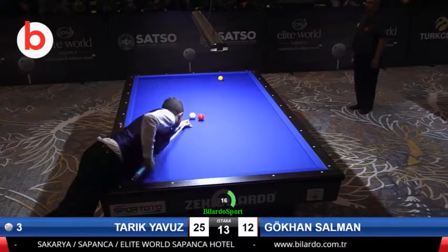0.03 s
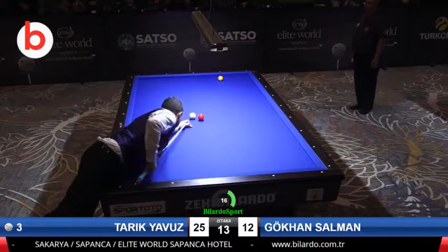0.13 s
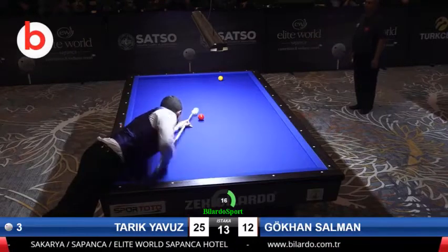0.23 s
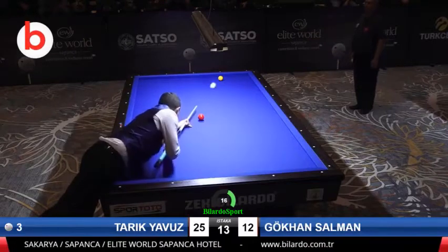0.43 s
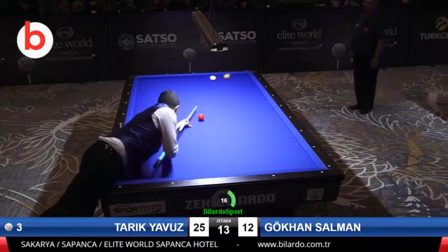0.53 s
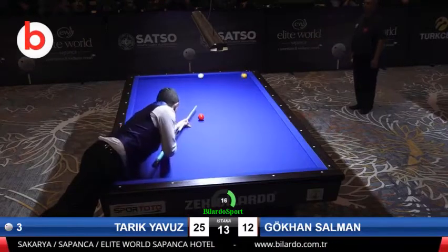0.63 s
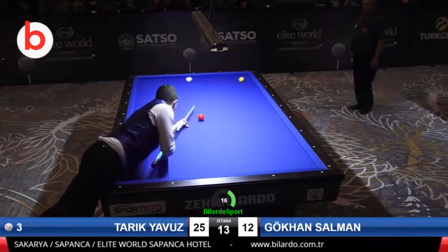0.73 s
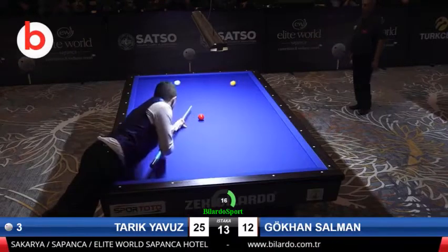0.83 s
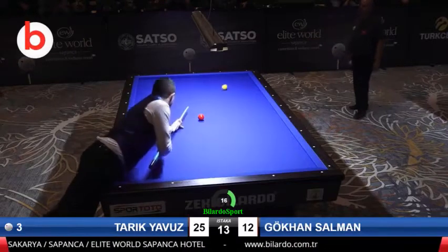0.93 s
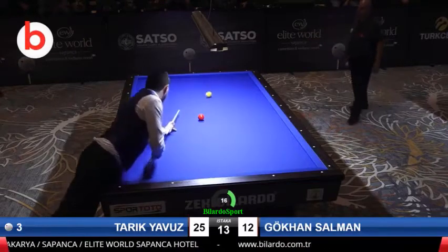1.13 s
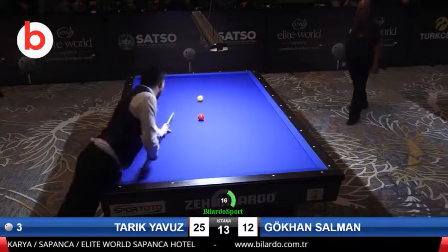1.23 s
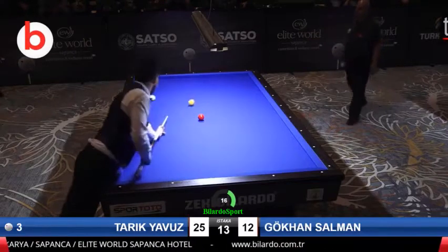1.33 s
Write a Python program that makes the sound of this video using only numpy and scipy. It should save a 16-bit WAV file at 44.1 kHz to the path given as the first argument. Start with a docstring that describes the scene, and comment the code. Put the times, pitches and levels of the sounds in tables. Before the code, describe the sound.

A billiard cue strikes a ball with a loud, woody knock, and a moment later the ball clicks hard and bright against a second one; both echo in a large, quiet hall, close and slightly overloaded.

```python
"""Faint rumble and hiss, then a carom shot in a large hall: the cue knocks the ball, which clicks
against a second ball 0.3 s later. Damped modes and a noise crack make the knock; half-sine contact
pulses along several paths make the click. Decaying filtered noise rings out the hall.
The microphone overloads on the blows; a noise suppressor swallows the ends of the tails."""
import sys
import numpy as np
from scipy import signal
from scipy.fft import rfft, irfft, next_fast_len
from scipy.io import wavfile
from scipy.ndimage import uniform_filter1d

SR = 44100
rng = np.random.default_rng(int(sys.argv[2]) if len(sys.argv) > 2 else 0)


def unload_wav(signal):
    """Save mono or channel-first audio to the path in sys.argv[1] as 16-bit WAV at rate SR, clipped to [-1, 1]."""
    wavfile.write(
        sys.argv[1],
        SR,
        np.round(np.clip(np.atleast_2d(signal).T, -1, 1) * 32767).astype(np.int16),
    )


N = 61739

# steady rumble and hiss (frequency [Hz], relative density [dB per Hz])
FLOOR_SPECTRUM = [(15, 2), (30, -1), (45, -14.5), (100, -19), (250, -28), (500, -27), (1000, -41),
                  (3500, -44), (6000, -42.5), (14500, -40), (16000, -56)]
# the hall's background air (frequency [Hz], relative density [dB per Hz])
AIR_SPECTRUM = [(100, -24.5), (420, -2), (900, -7.5), (2500, -9.5), (3800, -19), (8000, -20.5)]
# decay of the hall (frequency [Hz], t60 [s])
HALL_T60 = [(200, 1.5), (800, 0.9), (2400, 1.007), (5000, 0.62), (12000, .65)]
# what the cue blow sends into the hall (frequency [Hz], relative density [dB per Hz])
CUE_HALL_SPECTRUM = [(70, -51), (120, -31), (180, -6), (350, -14.5), (450, 2), (950, -1.5), (1400, -4),
                     (1900, -16.5), (2400, -11.5), (2850, -19), (5600, -21), (7000, -24), (11000, -27),
                     (15000, -32.5), (16000, -53.5)]
# narrow resonances that the cue leaves in the hall (centre [Hz], width [Hz], level over the rest [dB])
CUE_HALL_PEAKS = [(215, 20, 4.5), (314.8, 20, 10), (430, 25, -1.5), (730, 50, 8), (930, 70, 6),
                  (1215, 70, 6.5), (1718, 40, 14.5), (2100, 40, 12), (2403, 70, 12), (3070, 150, 7),
                  (5450, 500, 7.5)]
# ringing of cue and ball (frequency [Hz], level [dB], t60 [s])
CUE_MODES = [(430, -20, .18), (517, -22, 0.13), (735, -26.5, 0.046), (880, 1.5, 0.015), (955, -12.5, .08),
             (1170, -10.5, .06), (2450, -16.5, .05), (3050, -21.5, .03), (3900, -30.5, 0.075),
             (4740, -17, .02), (5940, -23, 0.05)]
# the tip's crack (frequency [Hz], relative density [dB per Hz])
CRACK_SPECTRUM = [(100, -39.5), (400, -14.5), (1000, 1.5), (2500, 0), (3800, -7.5), (5300, 3),
                  (6800, -15.5), (11000, -10), (16000, -22)]
# distinct echoes of the crack (time [s], level [dB])
CRACK_ECHOES = [(0.2379, -19), (0.2442, -18), (0.2483, -19.5), (.2505, -19.5)]
# click paths: direct, off table and rails, off ceiling, off walls (delay [s], level [dB], centre [Hz])
CLICK_PATHS = [(0, 0, 2550), (.00125, -6, 2550), (.00208, -9, 2550), (.0097, -23, 1900), (.0116, -2, 2950),
               (.0132, -15, 2200), (.018, -15, 3000), (.021, -19, 2000), (.023, -19, 2000)]
# what the click sends into the hall (frequency [Hz], relative density [dB per Hz])
CLICK_HALL_SPECTRUM = [(100, -55), (200, -29.5), (450, -23.5), (700, -17), (1000, -6.5), (1400, -1),
                       (2400, 5.5), (3700, 4.5), (5200, -6), (8000, -12.5), (12500, -0.5), (15500, -8.5),
                       (16500, -19)]
# resonances in the click's tail (centre [Hz], width [Hz], level over the rest [dB])
CLICK_HALL_PEAKS = [(696, 88, 13), (520, 46, 7.5), (2460, 190, 2)]
# phase between the ports (frequency [Hz], left lead [rad])
PORT_PHASE = [(50, 0), (800, .45), (2400, .25), (5000, .2), (10000, .05)]
# balance of the ports (frequency [Hz], left minus right [dB])
PORT_BALANCE = [(60, -2), (180, 1.5), (550, -0.5), (1650, -1.0), (4970, -2.5), (15000, 0)]
# suppressor threshold before learning (frequency [Hz], density [dB per Hz])
THRESHOLD = [(150, -68.5), (400, -89), (800, -79), (1400, -70.5), (2400, -79), (3800, -91.5), (6000, -91.5),
             (12000, -92)]

FLOOR_DB = -60.5
AIR_DB, AIR_FROM_S, AIR_RISE_S = -72.5, 0.61, 0.64
HALL_RIPPLE_DB, HALL_RIPPLE_SPACING_HZ = 1.5, 35.73  # uneven response
FAR_WALL_S, FAR_WALL_SPREAD_S, FAR_WALL_DB = .115, 0.01, -16  # blurred return swell
CUE_HALL_DB, CLICK_HALL_DB = -21.5, -21

CUE_S, CUE_DB, TIP_LEAD_S = .2195, 0, 0.0021  # the tip touches before the knock
CRACK_DB, CRACK_T60_S, CRACK_RISE_S = -13.5, 0.027, .002
SNAP_S, SNAP_DB = .2209, -13
THUD_S, THUD_HZ, THUD_DB, THUD_T60_S = .2318, 730, 0.5, 0.016

CLICK_S, CLICK_DB = .5114, 5
CONTACT_S, CONTACT_FILL_DB = .000328, -29.5  # duration; depth of spectral gaps in the tail
BALL_WIDTH_HZ = 1600  # band a ball radiates best

SUPPRESS_MAX_DB, SUPPRESS_DB_PER_DB = 24, 2.56  # deepest cut; cut per dB under threshold
LEARN_DB, LEARN_S = -10.5, 0.93  # share of lasting sound added to the threshold; time constant
CLIP_TOP = .56  # full scale = 1
TOP_HZ = 16200


def amp(db):
    """Decibels to gain."""
    return 10 ** (np.asarray(db) / 20)


def unit(x):
    """Scale to rms 1."""
    return x / np.sqrt(np.mean(x ** 2) + 1e-20)


def along(points, hz):
    """Interpolate (Hz, value) points on a log frequency axis."""
    point_hz, value = np.transpose(points)
    return np.interp(np.log(hz + 1), np.log(point_hz + 1), value)


def since(start_s):
    """Seconds after start_s, zero before."""
    return np.maximum(np.arange(N) / SR - start_s, 0)


def decay_60(t_s, t60_s):
    """Exponential decay that loses 60 dB in t60_s."""
    return np.exp(-np.log(1000) * t_s / t60_s)


def fade(t_s, rise_s, t60_s):
    """Rise with time constant rise_s, times exponential decay."""
    return (1 - np.exp(-t_s / rise_s)) * decay_60(t_s, t60_s)


def filtered(x, response):
    """Multiply the spectrum of x by a response of frequency, zero-padded."""
    m = next_fast_len(N + SR // 2)
    hz = np.fft.rfftfreq(m, 1 / SR)
    return irfft(rfft(x, m) * response(hz), m)[..., :N]


def noise(spectrum, side_db):
    """Coloured stereo noise of rms 1: common mid, weaker opposed side."""
    mid, side = filtered(rng.standard_normal((2, N)), lambda hz: amp(along(spectrum, hz)))
    side = amp(side_db) * side
    return unit(np.array([mid + side, mid - side]))


def resonance(hz, centre_hz, width_hz):
    """Causal band-pass response of a damped resonator."""
    damping = 1j * hz * width_hz
    return damping / (centre_hz ** 2 - hz ** 2 + damping)


def coloured(spectrum, peaks):
    """Gain over frequency: a broad spectrum with narrow resonant peaks."""
    def gain(hz):
        peaks_db = sum(db * abs(resonance(hz, centre_hz, width_hz)) ** 2
                       for centre_hz, width_hz, db in peaks)
        return amp(along(spectrum, hz) + peaks_db)
    return gain


def background():
    """Steady rumble and hiss, plus hall air that swells after the shot."""
    swell = np.clip(since(AIR_FROM_S) / AIR_RISE_S, 0, 1)
    steady = amp(FLOOR_DB) * noise(FLOOR_SPECTRUM, side_db=-20)
    return steady + amp(AIR_DB) * swell * noise(AIR_SPECTRUM, side_db=-4.5)


def hall(start_s, colour, early_db, early_t60_s, side_db):
    """Diffuse reflections: noise decaying at a rate set by frequency, with an early burst and far-wall swell."""
    knots = rng.standard_normal(size=4096)

    def ripple(hz):
        return amp(HALL_RIPPLE_DB * np.interp(hz / HALL_RIPPLE_SPACING_HZ, np.arange(len(knots)), knots))

    mid, side = filtered(rng.standard_normal((2, N)), lambda hz: colour(hz) * ripple(hz))
    diffuse = unit(mid + amp(side_db) * np.array([side, -side]))
    hz, t_s, bands = signal.stft(diffuse, SR, nperseg=256)
    decay = decay_60(np.maximum(t_s - start_s, 0), along(HALL_T60, hz)[:, None])
    tail = signal.istft(bands * decay, SR, nperseg=256)[1][:, :N]

    age_s = since(start_s)
    far_walls = 1 + amp(FAR_WALL_DB) * np.exp(-((age_s - FAR_WALL_S) / FAR_WALL_SPREAD_S) ** 2)
    onset = 1 - np.exp(-age_s / 0.00067)
    early = 1 + amp(early_db) * decay_60(age_s, early_t60_s)
    return tail * far_walls * onset * early


def ring(start_s, hz, t60_s, rise_s):
    """One damped sinusoidal mode struck at start_s."""
    t_s = since(start_s)
    return np.sin(2 * np.pi * hz * t_s) * fade(t_s, rise_s, t60_s)


def tip_crack():
    """The tip's contact noise: crack, brief bright snap and distinct echoes."""
    crack_fade = fade(since(CUE_S - TIP_LEAD_S), CRACK_RISE_S, CRACK_T60_S)
    crack = amp(CRACK_DB) * noise(CRACK_SPECTRUM, side_db=-10) * crack_fade
    snap_noise = noise([(2000, -17), (7000, 0.5), (13000, -8), (16000, -14.5)], side_db=-8.5)
    snap = amp(SNAP_DB) * snap_noise * fade(since(SNAP_S), rise_s=.0001, t60_s=.004)
    echo_fades = sum(amp(db) * fade(since(echo_s), rise_s=0.00036, t60_s=0.0082)
                     for echo_s, db in CRACK_ECHOES)
    echoes = noise(CRACK_SPECTRUM, side_db=-11) * echo_fades
    return crack + snap + echoes


def cue_strike():
    """The tip cracks, modes of cue and ball ring, a duller knock follows and the hall answers."""
    body = sum(amp(db) * ring(CUE_S, hz, t60_s, rise_s=0.0014) for hz, db, t60_s in CUE_MODES)
    thud = amp(THUD_DB) * ring(THUD_S, THUD_HZ, THUD_T60_S, rise_s=.0012)
    colour = coloured(CUE_HALL_SPECTRUM, CUE_HALL_PEAKS)
    room = amp(CUE_HALL_DB) * hall(CUE_S + .003, colour, early_db=-5, early_t60_s=.15, side_db=-12.5)
    return amp(CUE_DB) * body + tip_crack() + thud + room


def contact(hz):
    """Spectrum of the half-sine force between two balls: lobes with evenly spaced gaps."""
    return np.sinc(hz * CONTACT_S - .5) + np.sinc(hz * CONTACT_S + .5)


def click_arrival(arrival_s, centre_hz):
    """Contact force through the radiation band, delayed by phase; peak 1."""
    def response(hz):
        delay = np.exp(-2j * np.pi * hz * arrival_s)
        return contact(hz) * resonance(hz, centre_hz, BALL_WIDTH_HZ) ** 2 * delay

    pulse = filtered(signal.unit_impulse(N), response)
    return pulse / abs(pulse).max()


def ball_click():
    """A hard, brief contact gives a few bright cycles along several paths; the hall answers."""
    arrivals = sum(amp(CLICK_DB + db) * click_arrival(CLICK_S + delay_s, centre_hz)
                   for delay_s, db, centre_hz in CLICK_PATHS)
    hall_gain = coloured(CLICK_HALL_SPECTRUM, CLICK_HALL_PEAKS)

    def colour(hz):
        return np.hypot(contact(hz), amp(CONTACT_FILL_DB)) * hall_gain(hz)

    room = hall(CLICK_S + .012, colour, early_db=3.5, early_t60_s=0.056, side_db=-12)
    return arrivals + amp(CLICK_HALL_DB) * room


def scene():
    """The two blows as they reach the two microphone ports, split in phase and level."""
    half = np.array([[.5], [-.5]])  # left, right

    def ports(hz):
        return np.exp(half * 1j * along(PORT_PHASE, hz)) * amp(half * along(PORT_BALANCE, hz))

    return filtered(cue_strike() + ball_click(), ports)


def suppress(x, size=768):
    """Cut each band that falls under its threshold, which rises slowly with lasting sound."""
    hz, t_s, bands = signal.stft(x, SR, nperseg=size)
    power = np.mean(abs(bands) ** 2, axis=0) * size / SR  # shared by both channels
    power = uniform_filter1d(power, size=5, axis=0)
    power = abs(uniform_filter1d(power, size=3, axis=1))

    keep = np.exp(-t_s[1] / LEARN_S)
    learnt = signal.lfilter([1 - keep], [1, -keep], power, axis=1)
    threshold = amp(along(THRESHOLD, hz))[:, None] ** 2 + amp(LEARN_DB) ** 2 * learnt
    over_db = 10 * np.log10(power / threshold + 1e-20)  # negative under the threshold
    gain_db = np.clip(SUPPRESS_DB_PER_DB * over_db, -SUPPRESS_MAX_DB, 0)
    return signal.istft(bands * amp(gain_db), SR, nperseg=size)[1][:, :N]


def record(dry):
    """Suppress noise, add the background, overload smoothly and limit the band."""
    x = suppress(dry) + background()
    x = x / (1 + abs(x / CLIP_TOP) ** 8) ** (1 / 8)
    return filtered(x, lambda hz: 1 / (1 + (hz / TOP_HZ) ** 80))


dry = scene()
out = record(dry)
unload_wav(out)
```